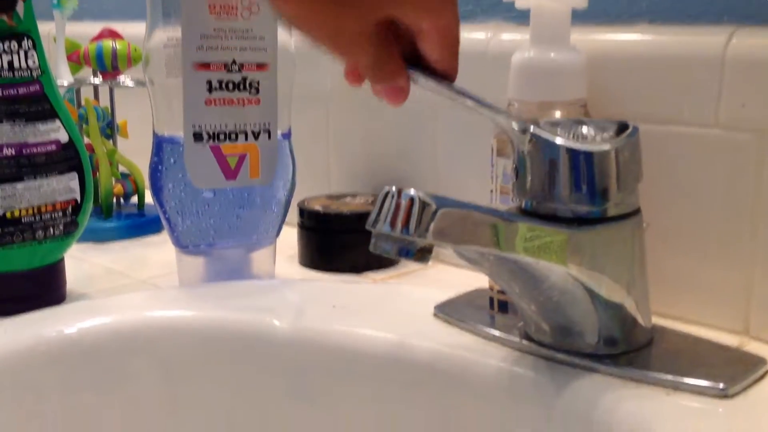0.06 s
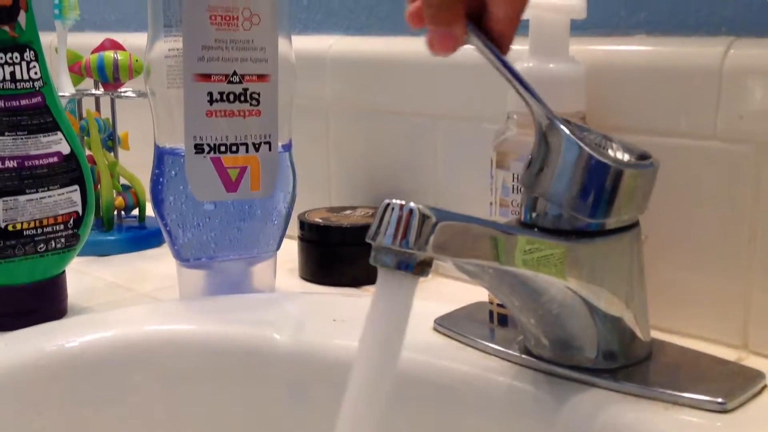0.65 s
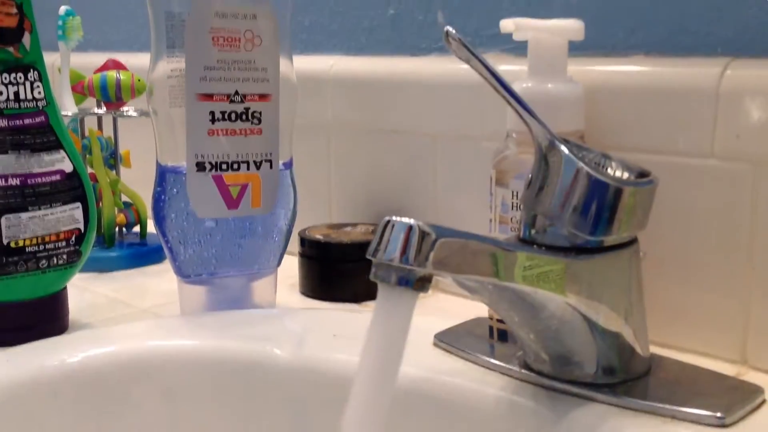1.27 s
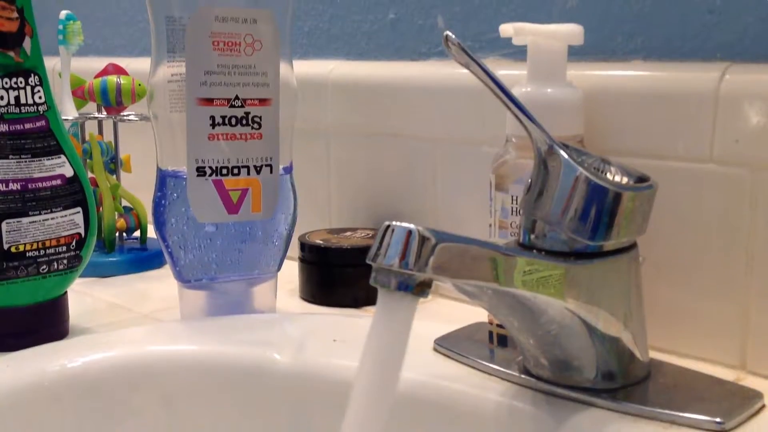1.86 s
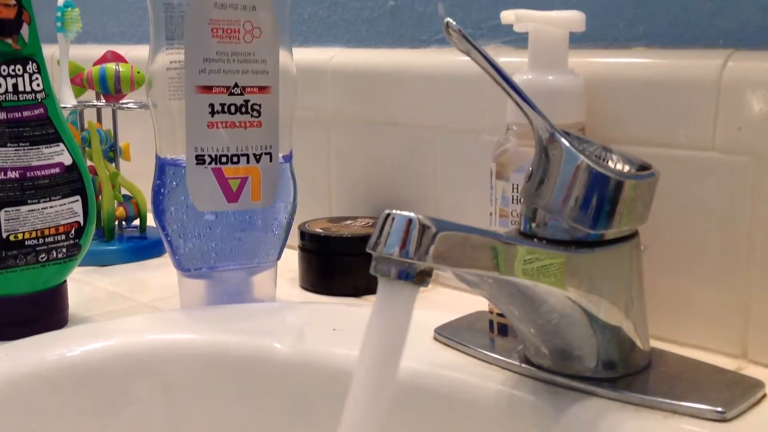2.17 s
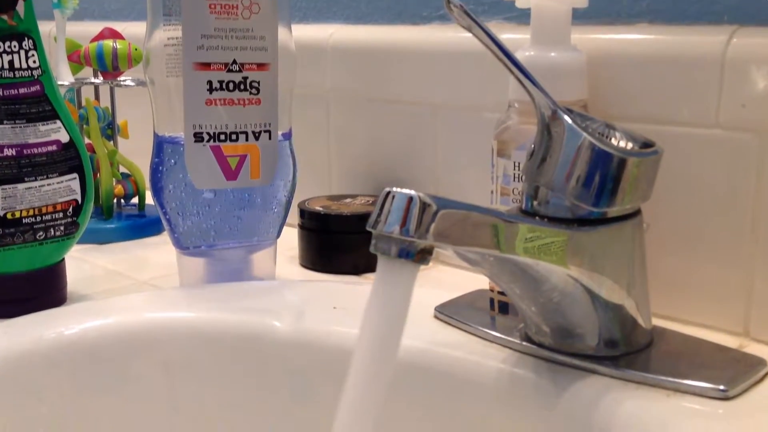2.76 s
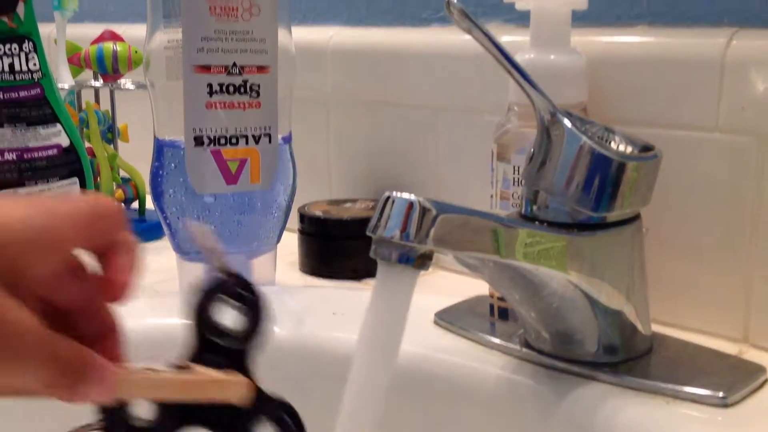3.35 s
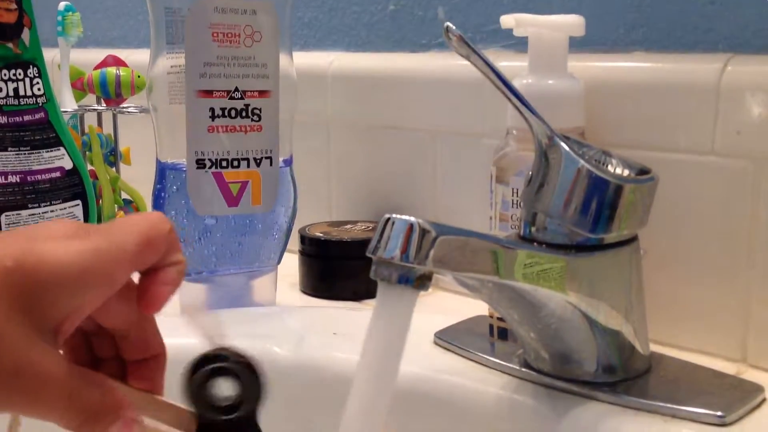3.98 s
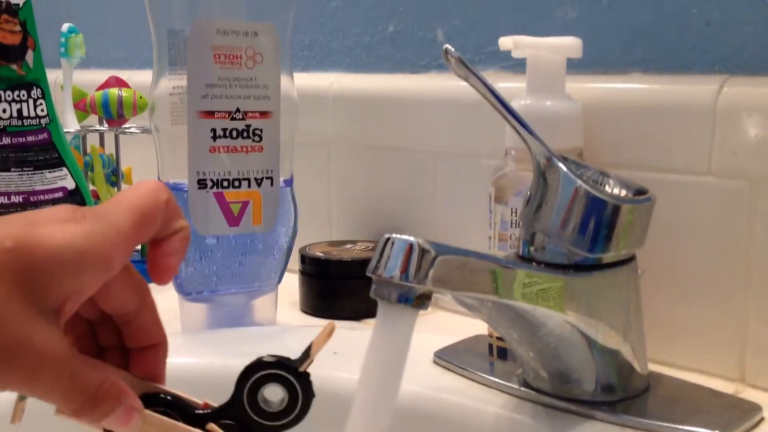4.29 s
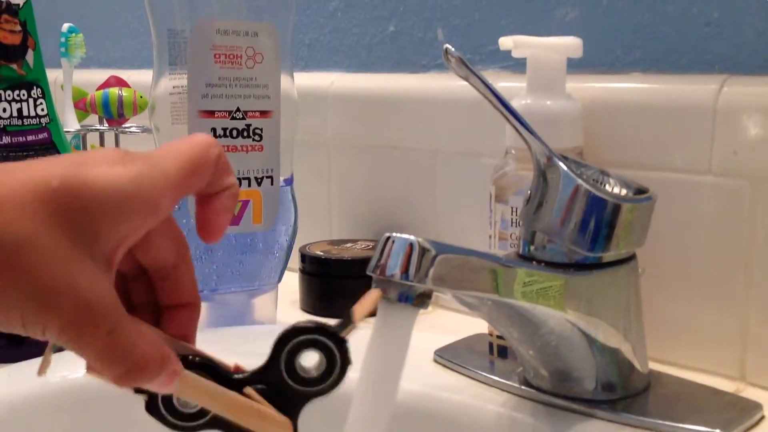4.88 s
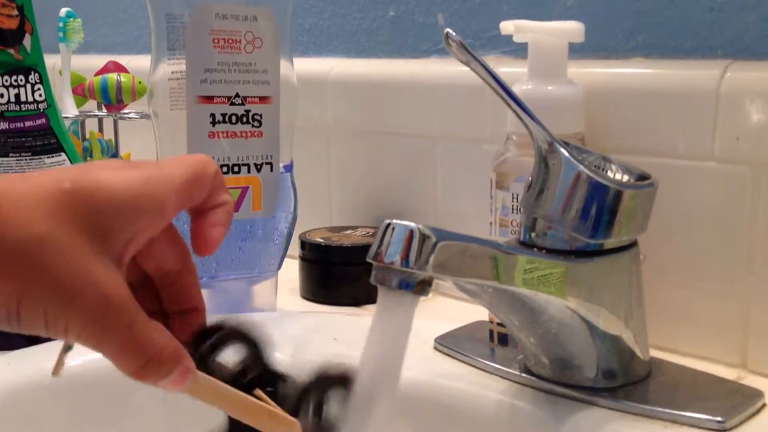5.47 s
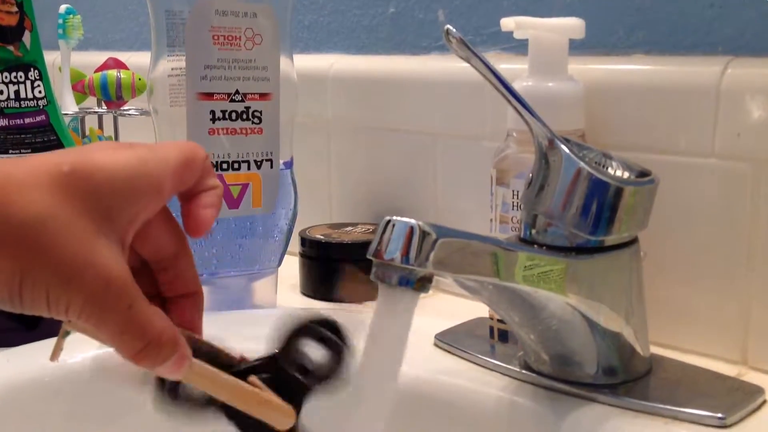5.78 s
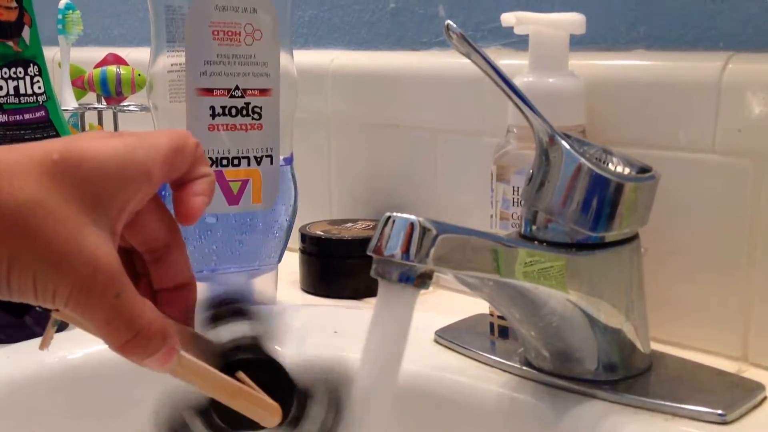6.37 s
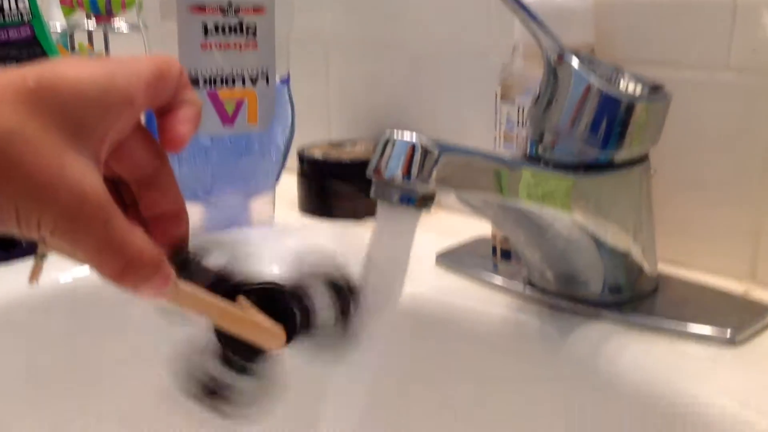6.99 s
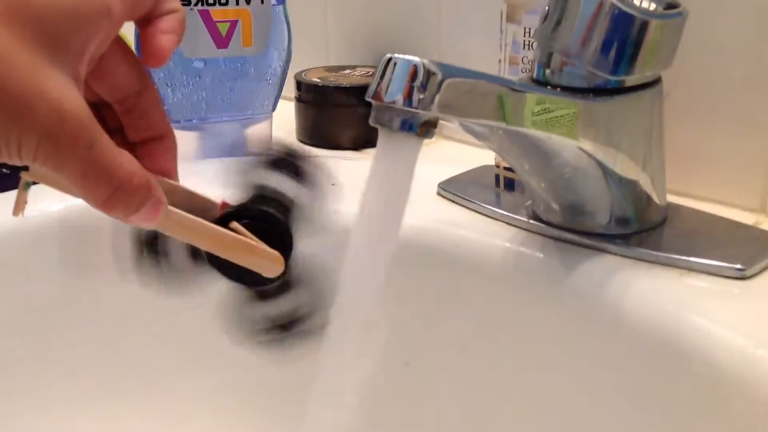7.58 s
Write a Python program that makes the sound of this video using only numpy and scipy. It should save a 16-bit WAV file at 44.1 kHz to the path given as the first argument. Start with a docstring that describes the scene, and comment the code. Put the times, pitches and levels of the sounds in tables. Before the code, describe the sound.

Heard close up, a tap opens with a faint rub and a few spits, and water runs into a ceramic sink with a bright, even hiss and a few small gurgles. Later a spinner is held in the stream and chops it into rhythmic splashing pulses that speed up slightly, dotted with sharp ticks of drops. A soft vent drone sits underneath in the small tiled room.

```python
"""In a small tiled bathroom, over a low ventilation hum, a tap's seal rubs as its lever is lifted.
The tap spits, then its aerated stream fizzes and splatters into a ceramic basin, close by; the bowl
rings hollow and trapped air gulps now and then. After about five seconds a three-armed spinner is held
into the stream: each arm slaps the jet and throws spray, faster as it spins up, and flung drops tick
on the ceramic."""
import sys
import numpy as np
from scipy import signal
from scipy.fft import rfft, irfft, next_fast_len
from scipy.io import wavfile
from scipy.ndimage import uniform_filter1d, map_coordinates

SR = 44100
rng = np.random.default_rng(int(sys.argv[2]) if len(sys.argv) > 2 else 0)


def dump(signal):
    """Clip the signal to [-1, 1] and save it as 16-bit WAV at the path in sys.argv[1]."""
    limited = np.clip(np.atleast_2d(signal).T, -1, 1)
    pcm = np.round(limited * 32767).astype(np.int16)
    wavfile.write(sys.argv[1], SR, pcm)


N = 341334


def stream(open_s=0.46, opening_s=0.335, fall_s=0.021, spinner_s=5.25):
    """The aerated jet fizzes and splatters on the basin, louder as the valve opens; its flow flutters."""
    spit = spurts()
    flow = ramp(open_s, opening_s)
    landed = ramp(open_s + fall_s, opening_s - fall_s)
    churn_db = 3.3 * ramp(spinner_s, 1.3)  # the broken jet splatters more as the spinner gathers speed
    fizz_gain = np.hypot(amp(-20.1) * flow ** 2.5, spit)
    splatter_gain = np.hypot(amp(-33 + churn_db) * landed ** 1.3, amp(-7) * spit * np.sqrt(landed))
    dip_db = -1.5 * np.exp(-((np.arange(N) / SR - 4.07) / 0.13) ** 2)  # the rush dips briefly
    flutter_db = 0.55 * wobble(30) + 0.55 * wobble(160)
    fine = bubbles(per_s=9000, pitch_hz=9020, spread=0.45, cycles=0.86, size_db=2.5)
    fizz = basin(froth(fine, share=0.38), above=True)
    coarse = bubbles(per_s=3000, pitch_hz=2690, spread=0.59, cycles=0.73, size_db=2.0)
    splatter = basin(froth(coarse, share=0.35), above=False)
    uncaught = np.sqrt(1 - 0.49 * ramp(spinner_s, 0.32))  # what the spinner catches misses the basin
    rush = fizz * fizz_gain + splatter * splatter_gain * amp(0.49 * wobble(25))
    return uncaught * amp(flutter_db + dip_db) * (rush + hollow())


def spurts(attack_s=0.004, decay_s=0.032):
    """Envelope of the tap's short spits while the valve opens."""
    # spits: start_s, level_db
    spits = [(.489, -37), (.512, -34.5), (.574, -31), (.609, -29.5), (.649, -25), (.693, -26.5),
             (.725, -18.5)]
    gain, t = np.zeros(N), np.arange(SR // 5) / SR
    for start_s, level_db in spits:
        add(gain, start_s, amp(level_db) * (1 - np.exp(-t / attack_s)) ** 2 * np.exp(-t / decay_s))
    return gain


def bubbles(per_s, pitch_hz, spread, cycles, size_db):
    """Tiny bursting bubbles: damped sines of random pitch and size, rms 1."""
    when, size, tune = rng.random((int(per_s * N / SR), 3)).T
    hz = np.clip(pitch_hz * np.exp(spread * np.log(tune / (1 - tune)) / 2), 500, 17000)[:, None]
    age = np.arange(64)
    turns = hz * age / SR
    gain = amp(size_db * np.minimum(-np.log(1 - size), 7))[:, None]
    grains = gain * np.sin(2 * np.pi * turns) * np.exp(-turns / cycles)
    positions = (when * N).astype(int)[:, None] + age
    return unit(np.bincount(positions.ravel(), grains.ravel(), N)[:N])


def froth(grains, share):
    """Distinct bubbles over the smooth rush of countless smaller ones."""
    return np.sqrt(share) * grains + np.sqrt(1 - share) * rng.standard_normal(N)


def basin(x, above, split_hz=4500, low_cut_hz=260):
    """The part of x above or below the split, coloured by water on ceramic, rms 1."""
    # tone curve of splashing water: frequency_hz, level_db
    water_curve = [(240, -21.5), (400, -24), (918, -20.5), (1270, -18.5), (1520, -13), (1720, -15),
                   (1950, -9), (2380, -13.5), (2570, -10.5), (3610, -7), (5300, -4), (6280, -3.5),
                   (8940, 0), (12200, -1), (15800, -7)]
    # resonances and notches of basin and spout: centre_hz, width_hz, gain_db
    modes = [(380, 64, 6), (470, 77, -3.5), (580, 39, 2), (763, 100, 4), (895, 75, 4), (1310, 115, -5.5),
             (1565, 160, 5), (1992, 100, 2.5), (2450, 57, 1.5), (2624, 120, 3.5), (2840, 90, 2),
             (3640, 170, -1.5), (4400, 160, 3), (4700, 360, -3), (5300, 460, 2.5), (6400, 280, -2.5),
             (7550, 250, -0.5), (8170, 300, -2), (8840, 220, 1.5), (9950, 250, 1), (10540, 220, 4),
             (12800, 230, 3), (13100, 270, -6.5), (13800, 300, 1)]

    def response(hz):
        low = 1 / (1 + (hz / split_hz) ** 6)
        low_cut = hz ** 2 / (hz ** 2 + low_cut_hz ** 2)  # small bubbles radiate no bass
        colour = amp(along(water_curve, hz) + bumps(modes, hz))
        return colour * low_cut * np.sqrt(1 - low if above else low)
    return unit(filtered(wander(x, depth_db=1.0), response))


def wander(x, depth_db):
    """The point of impact shifts, so the colour of the water drifts."""
    spectra = signal.stft(x, nperseg=512)[2]
    drift = uniform_filter1d(rng.standard_normal(spectra.shape), size=5, axis=0)  # smooth in frequency
    drift = uniform_filter1d(drift, size=40, axis=1)  # and in time
    return signal.istft(spectra * amp(depth_db * unit(drift)), nperseg=512)[1][:N]


def hollow(pitch_hz=1920, width_hz=160, rise_s=0.034, fade_s=0.2):
    """The jet excites one broad resonance of the bowl."""
    # spells of hollow ringing: start_s, end_s, level_db
    spells = [(.57, 3.12, -43.5), (4.18, 4.46, -40)]
    ring = unit(filtered(rng.standard_normal(N), lambda hz: resonance(hz, pitch_hz, width_hz) ** 2))
    return ring * sum(amp(level_db) * ramp(start_s, rise_s) * (1 - ramp(end_s - fade_s, fade_s))
                      for start_s, end_s, level_db in spells)


def spinner(attack_s=0.002, typical_gap_s=0.097, typical_crossing_s=0.058):
    """Each arm slaps into the jet, then sheds spray until it has passed; faster arms pass sooner."""
    # an arm meets the jet: start_s, spray_db, slap_db, slap_pitch_hz
    arms = [(5.374, -27, -29, 4900), (5.436, -24.5, -40, 4500), (5.586, -26, -30, 3600),
            (5.698, -21, -28, 5400), (5.806, -22, -31, 5400), (5.895, -21, -36, 5400),
            (6.049, -22, -32, 4900), (6.196, -23, -30, 3900), (6.315, -22.5, -36, 4300),
            (6.464, -21.5, -26, 4300), (6.559, -22.5, -27.5, 3200), (6.67, -24.5, -30.5, 4100),
            (6.763, -24, -31.5, 3500), (6.859, -21.5, -32, 3800), (6.952, -23.5, -30.5, 3600),
            (7.049, -22.5, -30.5, 4300), (7.125, -21, -32, 4600), (7.21, -21, -31, 3800),
            (7.306, -20, -32, 2400), (7.381, -20.5, -33, 3500), (7.479, -21, -32, 3400),
            (7.571, -22, -30.5, 3600), (7.657, -20, -28, 3700), (7.716, -24, -35, 4000)]
    spray_gain, slaps = np.zeros((2, N))
    t = np.arange(SR // 3) / SR
    rise = 1 - np.exp(-t / attack_s)
    gaps = np.diff([arm[0] for arm in arms])
    for (start_s, spray_db, slap_db, pitch_hz), gap_s in zip(arms, np.append(gaps, gaps[-1])):
        crossing_s = typical_crossing_s * (gap_s / typical_gap_s) ** 1.3
        add(spray_gain, start_s, amp(spray_db) * rise * np.exp(-(t / crossing_s) ** 3 / 2))
        slap_gain = amp(slap_db) * rise * np.exp(-(t / (0.58 * crossing_s)) ** 2)
        add(slaps, start_s, slap_gain * band(len(t), pitch_hz, width_hz=2100))
    grains = bubbles(per_s=5000, pitch_hz=8300, spread=0.42, cycles=1.0, size_db=2.0)
    spray = basin(froth(grains, share=0.45), above=True)
    return spray_gain * spray + slaps


def drops(pitch_hz=8500, t60_s=0.0064):
    """Flung drops tick on the ceramic."""
    # single drop hits: start_s, level_db
    hits = [(6.0452, -8), (6.4622, -8), (6.4797, -8), (6.6394, -12), (6.6894, -13), (7.0652, -7),
            (7.1681, -8.5), (7.4304, -8)]
    out, t = np.zeros(N), np.arange(SR // 50) / SR
    for start_s, level_db in hits:
        ping_hz = pitch_hz * np.exp(0.2 * rng.normal())
        tick = np.sin(2 * np.pi * ping_hz * t) + 0.46 * rng.standard_normal(len(t))
        add(out, start_s, amp(level_db - 60 * t / t60_s) * tick)
    return filtered(out, lambda hz: resonance(hz, pitch_hz, width_hz=9000))


def gulps(ring_cycles=51, glide=0.097, spread=0.35, scatter_s=0.016, count=20):
    """Trapped air rings as a small cluster of bubbles, each rising in pitch; big pockets ring longer."""
    # air pockets in the basin and pipe: start_s, pitch_hz, level_db
    pockets = [(.603, 265, -40.5), (.644, 880, -33.5), (.75, 905, -32), (3.651, 1000, -32),
               (3.752, 1063, -30), (6.575, 686, -44), (7.118, 440, -45), (7.225, 500, -46),
               (7.303, 1190, -30.5), (7.306, 345, -44)]
    out, t = np.zeros(N), np.arange(SR // 3) / SR
    for start_s, pitch_hz, level_db in pockets:
        t60_s = ring_cycles / pitch_hz
        envelope = amp(level_db - 60 * t / t60_s) * (1 - np.exp(-t / 0.002))
        for late, size in rng.random((count, 2)):
            bubble_hz = pitch_hz * np.exp(spread * (1 - 2 * size))
            phase = 2 * np.pi * bubble_hz * t * (1 + glide * t / t60_s)
            add(out, start_s + scatter_s * late, envelope * np.sin(phase))
    return out * np.sqrt(2 / count)


def lever(attack_s=0.012):
    """The valve seal rubs in short, faintly pitched strokes as the lever lifts."""
    # rubs of the seal: start_s, decay_s, pitch_hz, width_hz, level_db
    rubs = [(0, 0.1, 2100, 900, -63), (.155, 0.21, 1140, 110, -63), (.36, .1, 1270, 160, -65)]
    out, t = np.zeros(N), np.arange(SR // 2) / SR
    for start_s, decay_s, pitch_hz, width_hz, level_db in rubs:
        stroke = amp(level_db) * (1 - np.exp(-t / attack_s)) * np.exp(-(t / decay_s) ** 2)
        add(out, start_s, stroke * band(len(t), pitch_hz, width_hz))
    return out


def tiles(x, shifting_share=0.44, predelay_s=0.003):
    """Reverb off the tiled walls: part of it changes as the stream shifts, and the treble dies first."""
    # decay of the room: frequency_hz, t60_s
    decay_times = [(200, 0.6), (2000, 0.25), (8000, 0.16), (15000, 0.11)]
    out, block = np.zeros(N), SR // 4
    steady = rng.standard_normal(SR // 2)
    for start in range(0, N, block):
        shifting = rng.standard_normal(SR // 2)
        echoes = np.sqrt(1 - shifting_share) * steady + np.sqrt(shifting_share) * shifting
        hz, t, spectra = signal.stft(echoes, SR, nperseg=256)
        decay = amp(-60 * t / along(decay_times, hz)[:, None])
        tail = signal.istft(spectra * decay, SR, nperseg=256)[1]
        wet = signal.fftconvolve(x[start:start + block], tail / np.linalg.norm(tail))
        add(out, start / SR + predelay_s, wet)
    return out


def vent(level_db=-50.5):
    """Moving air drones in the resonances of its duct."""
    # tone curve of the airflow: frequency_hz, level_db
    air_curve = [(25, -44), (45, -26), (90, -15.5), (135, -2.5), (195, -6.5), (240, -4), (320, -15),
                 (460, -15.5), (600, -13.5), (1000, -23.5), (2000, -27), (5000, -32.5), (10000, -35),
                 (15000, -42)]
    # resonances and a notch of the duct: centre_hz, width_hz, gain_db
    duct_modes = [(58, 14, 5), (121.7, 12, 6.5), (150, 16, 8.5), (243, 35, 5.5), (300, 23, -7),
                  (328.6, 52, 11.5)]
    drone = filtered(rng.standard_normal(N), lambda hz: amp(along(air_curve, hz) + bumps(duct_modes, hz)))
    return amp(level_db) * unit(drone)


def amp(db):
    """Decibels to gain."""
    return 10 ** (np.asarray(db) / 20)


def unit(x):
    """Scale to rms 1."""
    return x / np.sqrt(np.mean(x ** 2) + 1e-20)


def add(track, start_s, sound):
    """Mix a sound into a track."""
    part = track[round(start_s * SR):][:len(sound)]
    part += sound[:len(part)]


def ramp(start_s, length_s):
    """A linear fade from 0 to 1."""
    return np.clip((np.arange(N) / SR - start_s) / length_s, 0, 1)


def wobble(per_s):
    """A smooth random curve through per_s points a second."""
    return map_coordinates(rng.standard_normal(int(N * per_s / SR) + 4), [np.arange(N) * per_s / SR])


def along(points, hz):
    """Read (frequency_hz, value) points on a log frequency axis."""
    point_hz, values = np.transpose(points)
    return np.interp(np.log(hz + 1), np.log(point_hz + 1), values)


def bumps(rows, hz):
    """Gain in dB of a set of resonances and notches."""
    return sum(db / (1 + (2 * (hz - centre) / width) ** 2) for centre, width, db in rows)


def resonance(hz, centre_hz, width_hz):
    """Response of one damped mode."""
    return 1j * hz * width_hz / (centre_hz ** 2 - hz ** 2 + 1j * hz * width_hz)


def band(samples, pitch_hz, width_hz):
    """A stretch of noise in one resonance, rms 1."""
    response = resonance(np.fft.rfftfreq(samples, 1 / SR), pitch_hz, width_hz) ** 2
    return unit(irfft(rfft(rng.standard_normal(samples)) * response, samples))


def filtered(x, response):
    """Shape x with a frequency response."""
    size = next_fast_len(N + SR // 2)
    return irfft(rfft(x, size) * response(np.fft.rfftfreq(size, 1 / SR)), size)[..., :N]


def scene():
    """Water, its reverb, the lever and the hum, alike in both channels."""
    water = stream() + spinner() + drops() + gulps()
    mono = amp(-0.5) * water + amp(-11) * tiles(water) + lever() + vent()
    return np.array([mono, mono])


def record(dry):
    """A steep high cut takes off the very top of the treble."""
    cutoff_hz, edge_hz = 15800, 200
    return filtered(dry, lambda hz: np.clip((cutoff_hz - hz) / edge_hz + 0.5, 0, 1))


dry = scene()
out = record(dry)
dump(out)
```